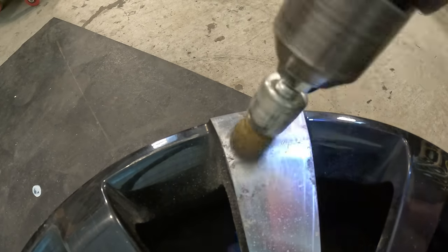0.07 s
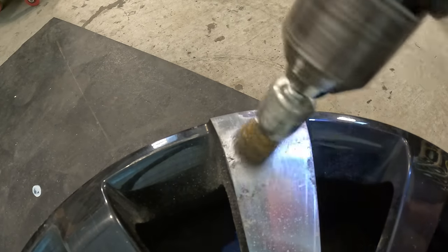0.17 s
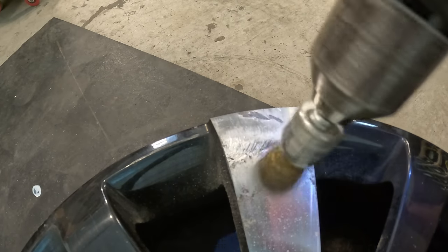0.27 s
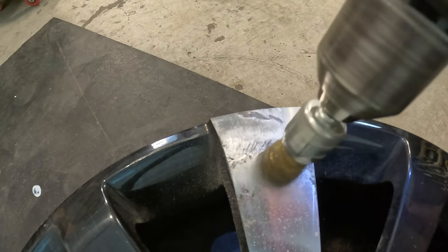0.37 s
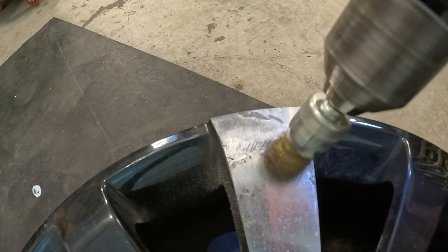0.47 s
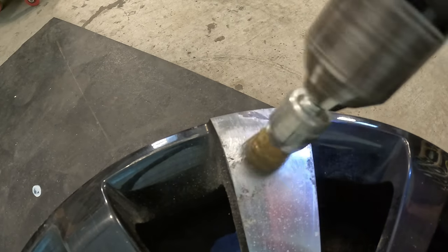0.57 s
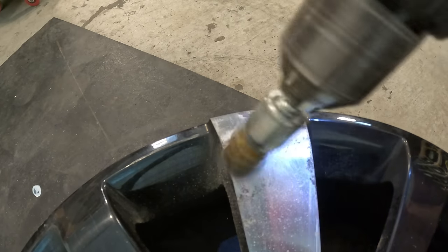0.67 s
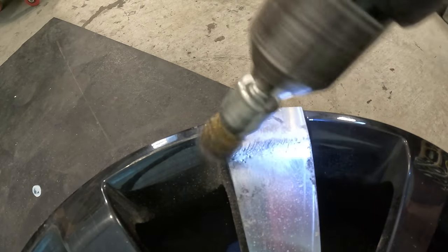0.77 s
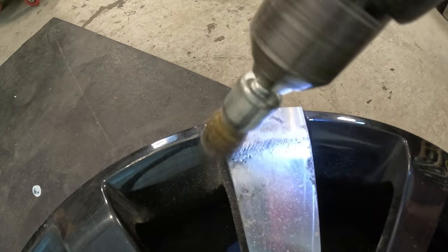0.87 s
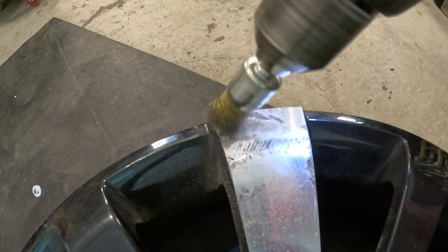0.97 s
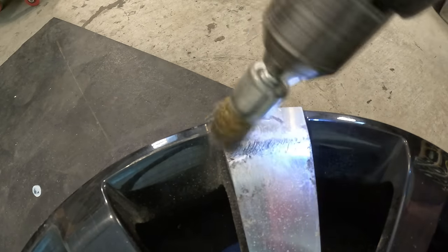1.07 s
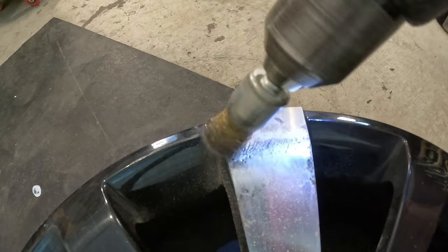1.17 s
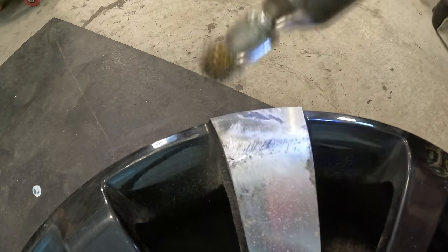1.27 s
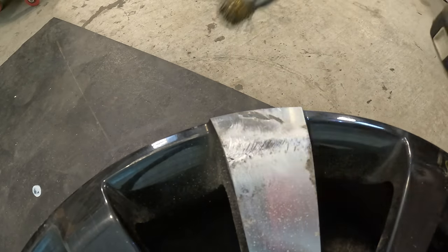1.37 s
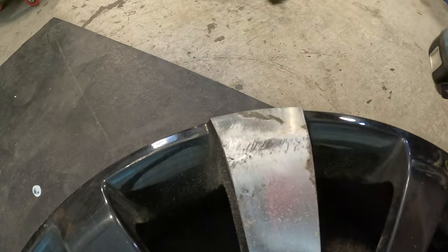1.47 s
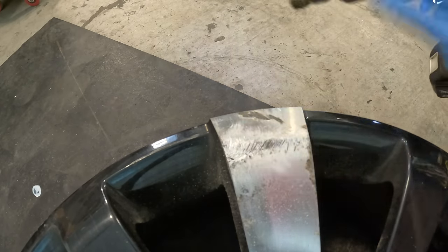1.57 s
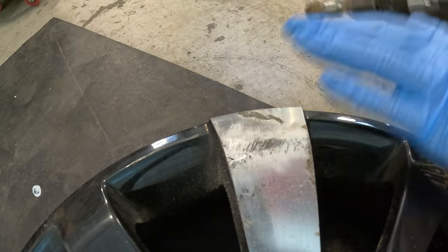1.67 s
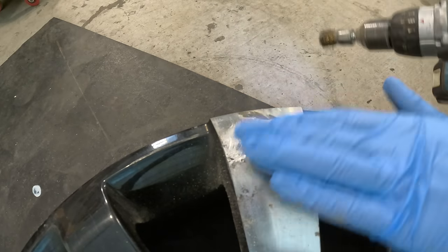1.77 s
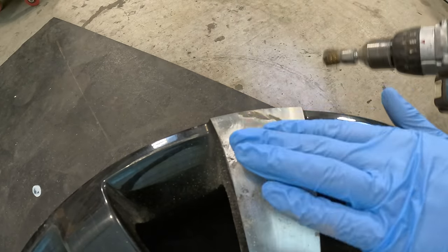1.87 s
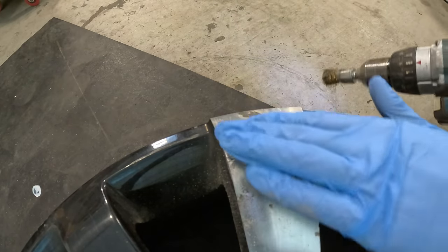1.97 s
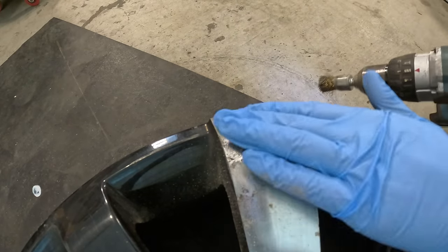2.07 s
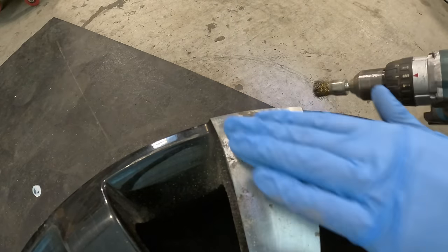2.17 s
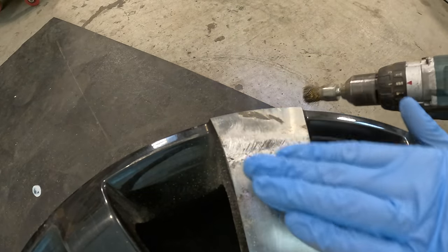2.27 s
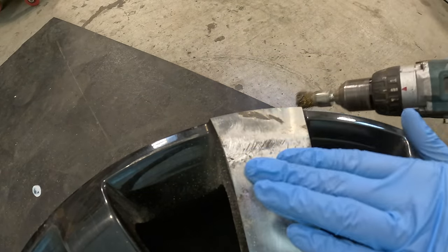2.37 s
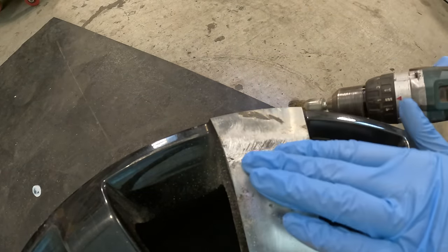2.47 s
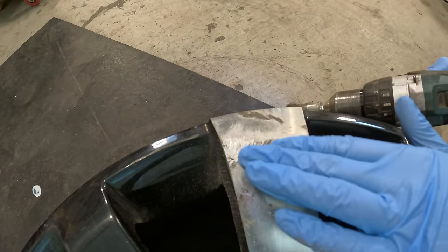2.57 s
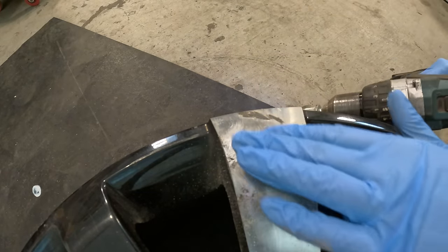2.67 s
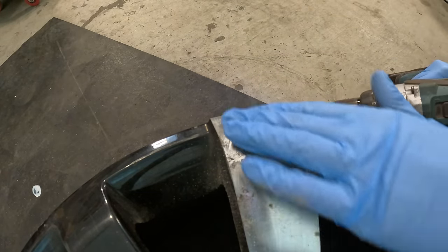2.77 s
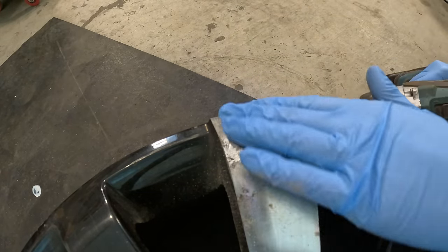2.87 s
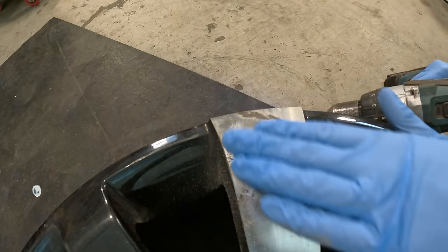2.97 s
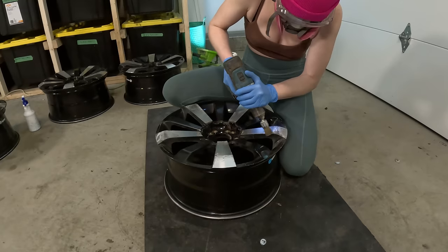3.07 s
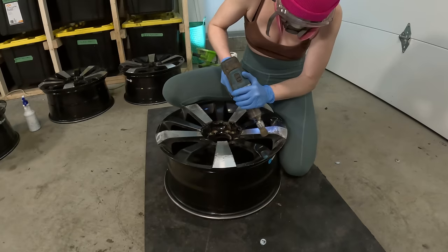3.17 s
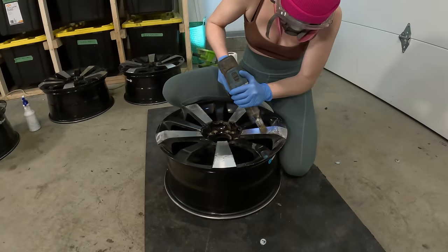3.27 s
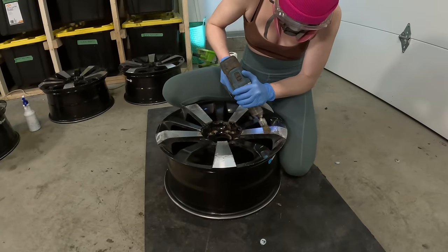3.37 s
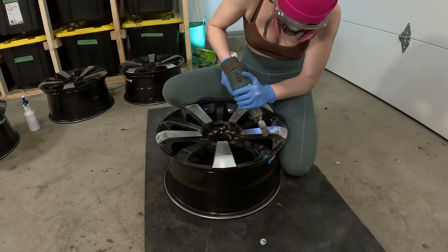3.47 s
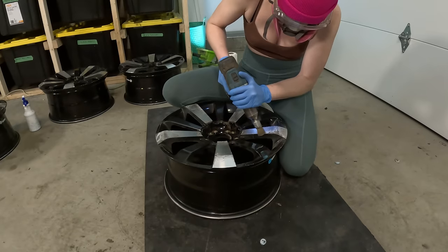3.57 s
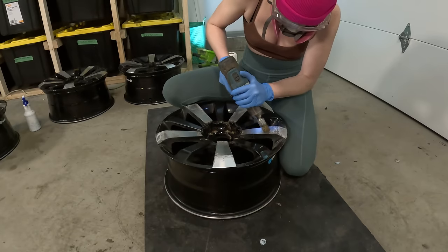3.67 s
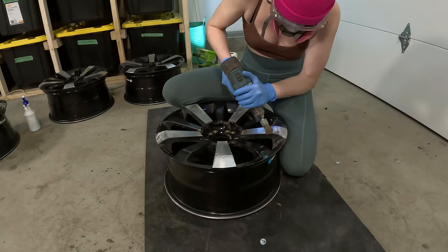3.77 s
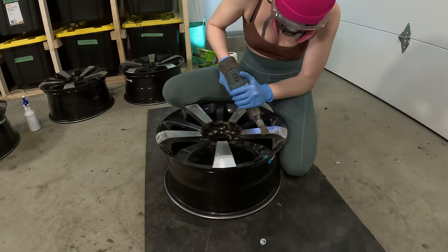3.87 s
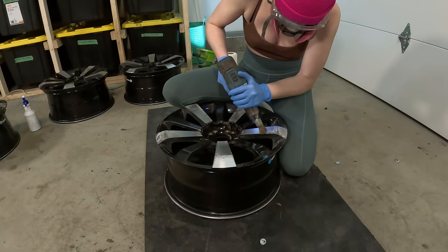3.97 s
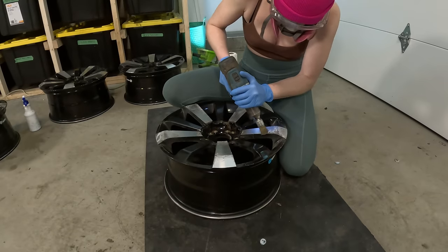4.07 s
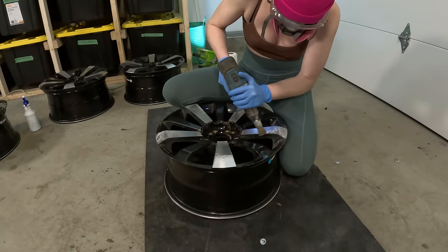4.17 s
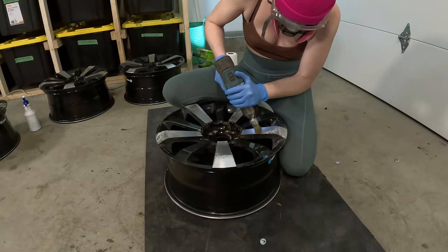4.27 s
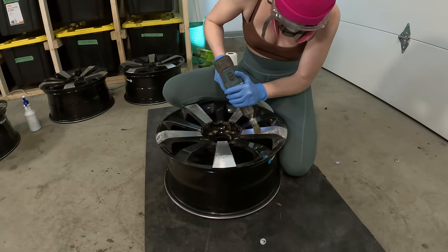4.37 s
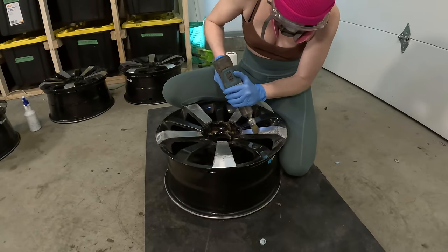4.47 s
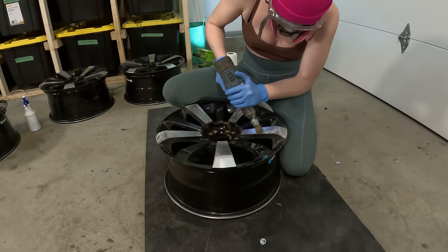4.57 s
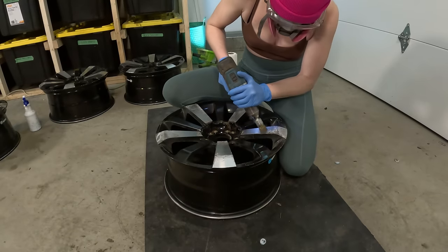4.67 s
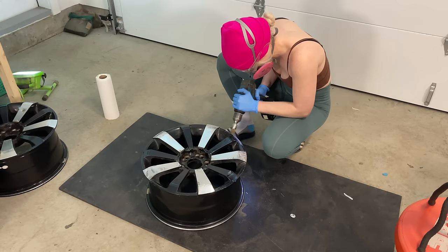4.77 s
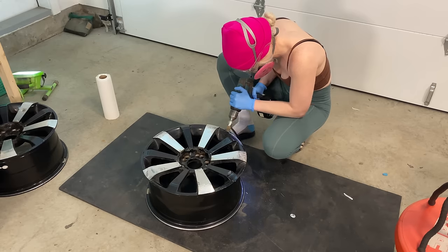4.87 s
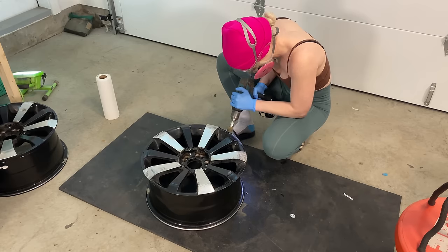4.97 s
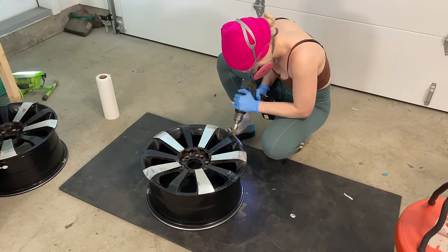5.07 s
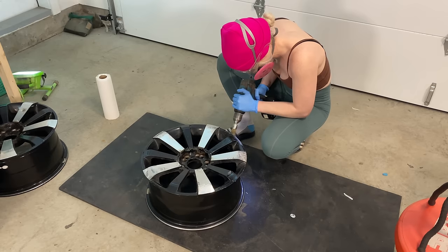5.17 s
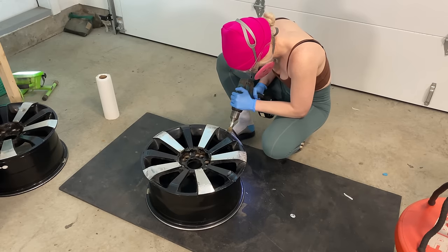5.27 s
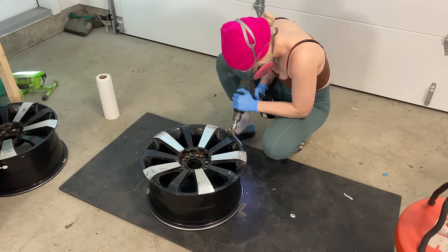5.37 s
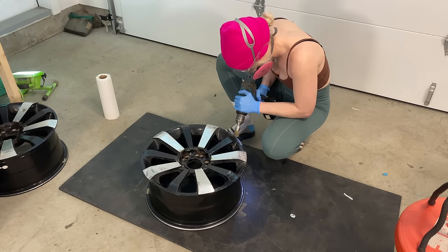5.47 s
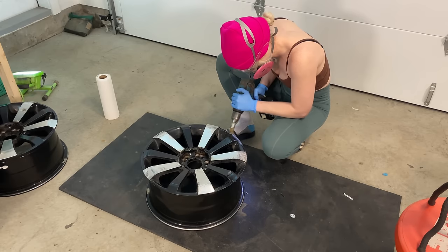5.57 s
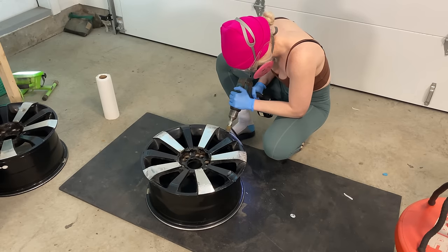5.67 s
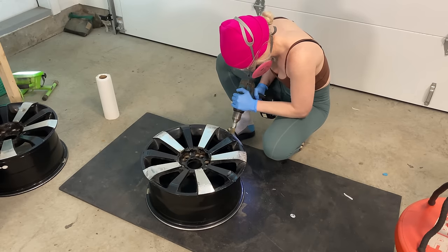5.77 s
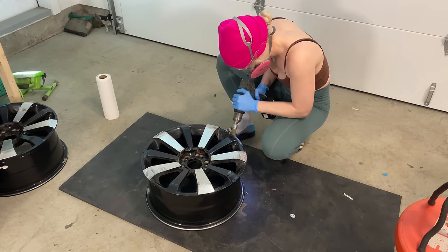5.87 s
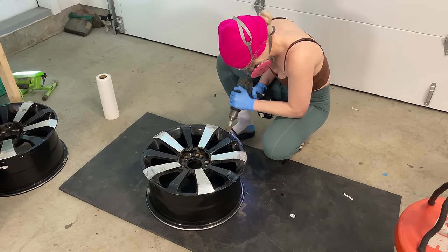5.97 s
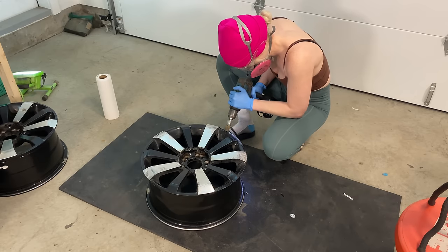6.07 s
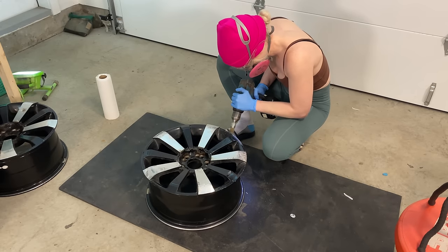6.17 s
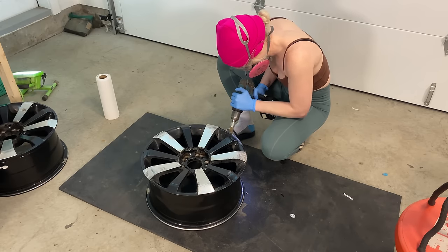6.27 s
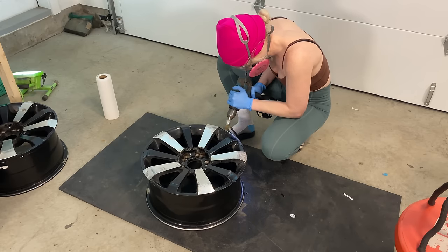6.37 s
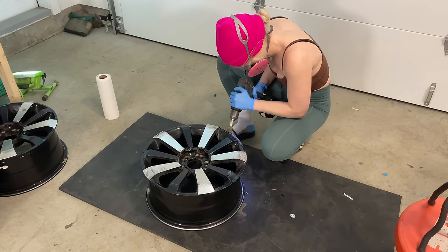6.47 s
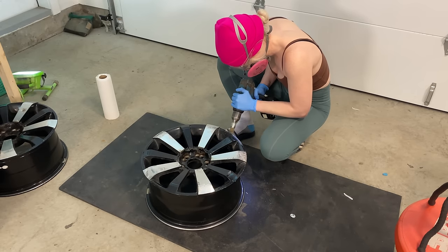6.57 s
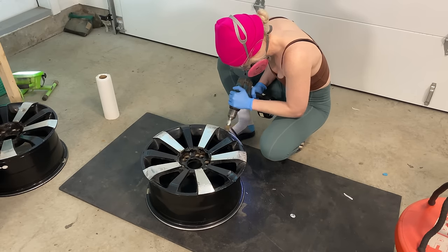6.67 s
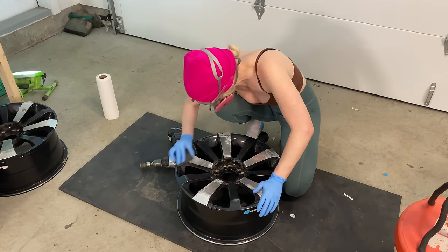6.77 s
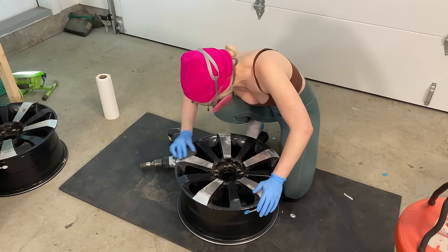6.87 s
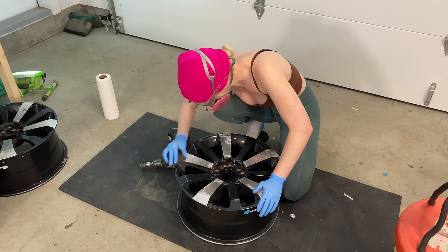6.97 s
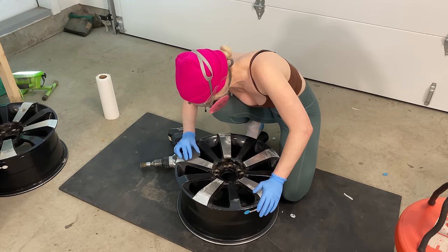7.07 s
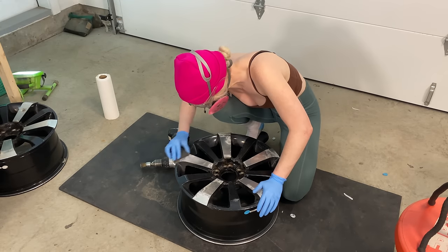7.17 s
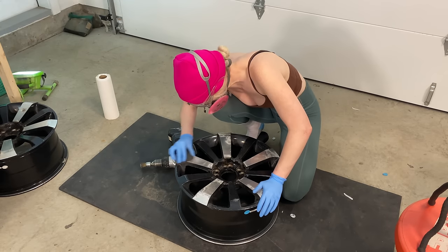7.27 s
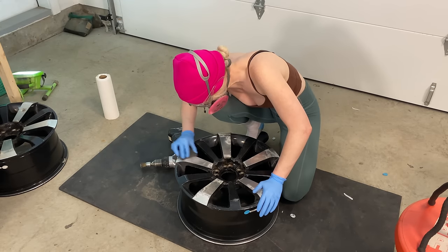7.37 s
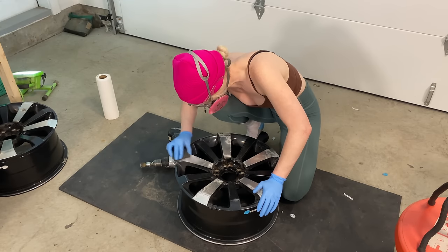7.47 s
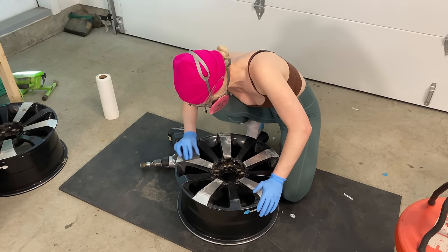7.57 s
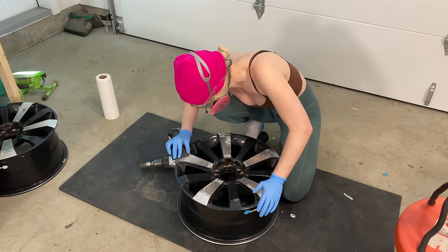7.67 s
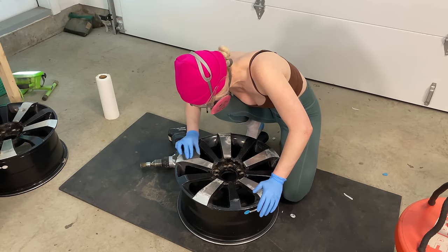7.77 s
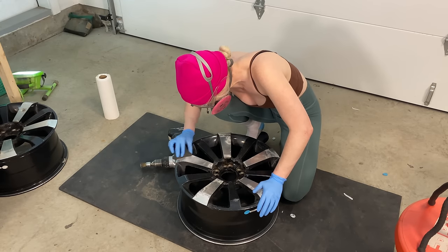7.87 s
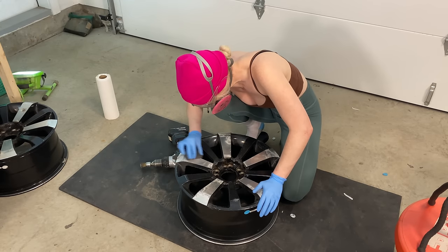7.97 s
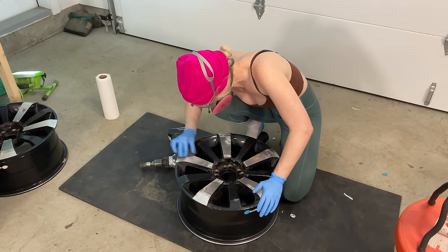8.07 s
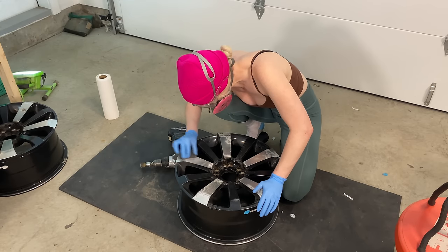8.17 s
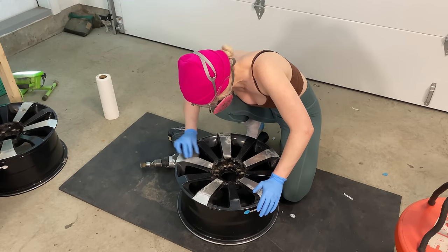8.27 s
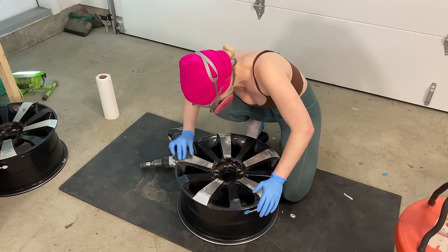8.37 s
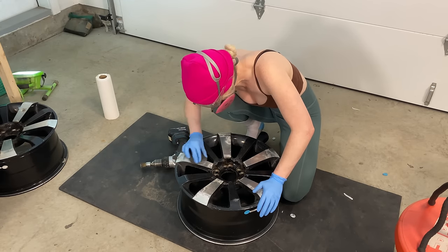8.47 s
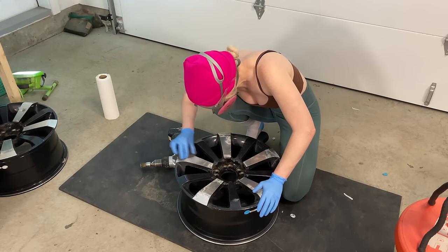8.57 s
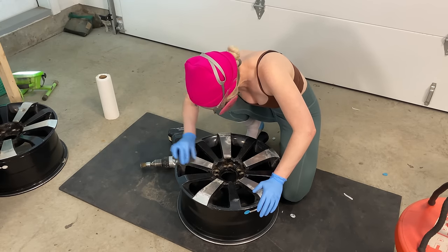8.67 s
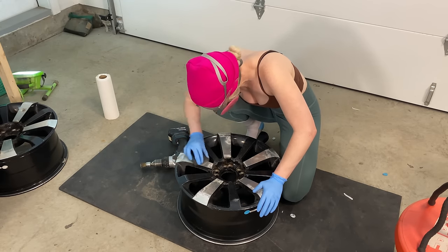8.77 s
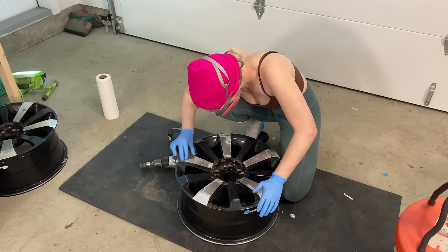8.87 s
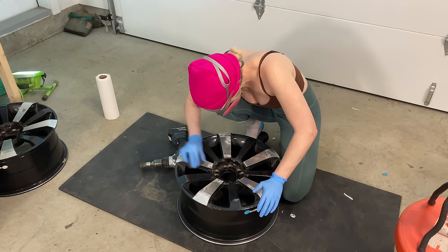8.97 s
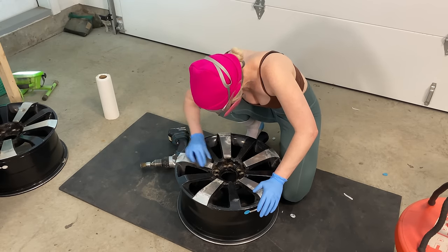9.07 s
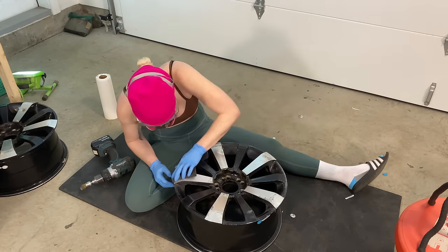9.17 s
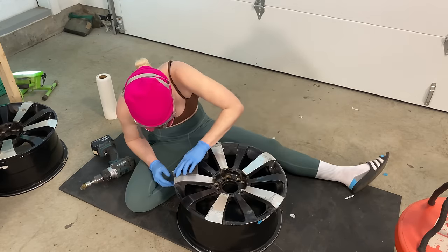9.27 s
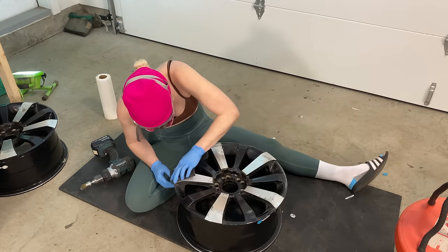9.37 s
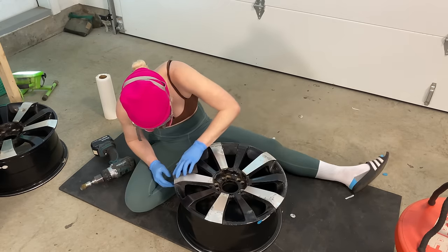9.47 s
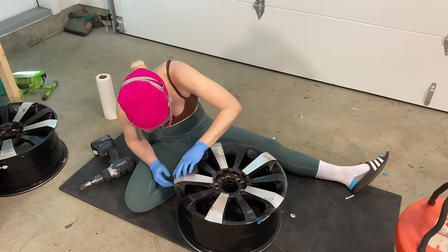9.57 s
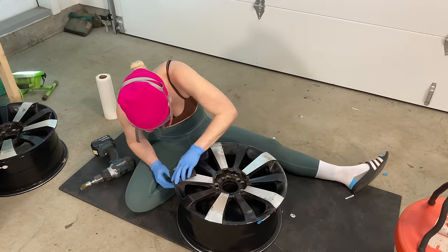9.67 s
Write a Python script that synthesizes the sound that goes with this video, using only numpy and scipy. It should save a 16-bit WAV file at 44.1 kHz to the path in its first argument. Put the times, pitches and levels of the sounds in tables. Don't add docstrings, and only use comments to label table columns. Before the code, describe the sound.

A cordless drill whirs a wire brush harshly on a metal wheel, clacks to a stop, then more brushing gives way to quick hand sanding.

```python
import sys
import numpy as np
from scipy import signal
from scipy.io import wavfile

SR = 44100
rng = np.random.default_rng(int(sys.argv[2]) if len(sys.argv) > 2 else 0)


def attenuation_scalar(level_db):
    decades = np.asarray(level_db, float) / 20
    return 10 ** decades


def wav_out(sig):
    wavfile.write(sys.argv[1], SR, np.round(np.clip(np.atleast_2d(sig).T, -1, 1) * 32767).astype(np.int16))


N = 427769
SWAP_S = 4.806

# f/Hz, then level under the scrape/dB brushed near, wiped, brushed at middle and far range, sanded
WHEEL_MODES = [(1077, -23, -16.5, -33, -26, -23), (1146, -22, -16, -24.5, -24, -24),
               (1858, -24, -48, -52, -23, -48), (2135, -32, -25, -32, -22, -28),
               (2345, -24, -30, -33, -41, -34), (2530, -46, -27, -30, -44, -52),
               (2815, -47, -21, -29, -52, -29), (3100, -31, -18, -29, -26, -26),
               (3370, -21, -18, -19, -34, -26), (3943, -20, -18, -28, -44, -64),
               (4100, -32, -20, -22, -30, -22), (5000, -20, -29, -25, -44, -41),
               (5460, -22, -45, -26, -23, -35), (7272, -34, -18, -45, -42.5, -42)]
# f/Hz, side under mid/dB
SIDE_UNDER_MID = [(60, -8), (200, -9.5), (700, -10.5), (1300, -12.5), (2400, -6), (4400, -11.5),
                  (8000, -13.5), (14000, -1)]
# start t/s, end t/s, scrape level/dB, brightness/dB, body at the start/dB
BRUSH_BOUTS = [
    (0.0, 1.27, -34, 3.5, 4.5),
    (3.038, 4.806, -38, 3.5, 1.5),
    (4.8, 6.74, -41, -3, 1.5),
]
# t/s, f/Hz, level/dB
FAR_SWEEP = [(4.8, 1180, -52), (4.93, 1187, -52), (5.03, 1198, -46), (5.15, 1191, -50), (5.35, 1193, -48),
             (5.59, 1181, -52), (5.7, 1192, -48), (5.82, 1206, -47), (5.93, 1197, -48), (6.02, 1174, -51),
             (6.18, 1204, -46.5), (6.29, 1203, -48), (6.39, 1176, -50), (6.46, 1190, -49),
             (6.57, 1202, -47), (6.74, 1190, -50)]
# multiple of the mesh, level/dB near, middle pressed, middle eased, far pressed, far eased
GEAR_LINES = [(1.0, 0, 0, 0, 0, 0), (1.2, -70, -58, -63, -67, -68), (1.5, -70, -70, -70, -68, -62),
              (1.6, -50, -64, -61, -60, -65), (1.8, -60, -58, -58, -68, -72),
              (1.9, -64, -60, -68, -68, -68), (2.0, -55, -56, -55, -61, -56),
              (2.1, -58, -53, -54, -55, -57), (2.2, -53, -58, -47, -57, -58),
              (2.3, -64, -68, -61, -65, -64), (2.4, -53, -66, -59, -62, -66),
              (2.5, -57, -68, -68, -66, -57), (2.6, -56, -59, -66, -62, -64),
              (2.7, -62, -57, -52, -68, -65), (2.8, -62, -66, -66, -62, -70),
              (2.9, -62, -57, -59, -70, -63), (2.997, -58, -47, -45.5, -58, -56),
              (3.2, -58, -57, -64, -63, -61), (3.4, -53, -62, -62, -66, -66),
              (3.3, -58, -60, -64, -63, -60), (3.5, -58, -64, -66, -63, -60),
              (4.0, -61, -65, -61, -68, -70), (4.2, -57, -57, -59, -58, -54),
              (4.4, -62, -61, -60, -65, -66), (4.6, -64, -62, -58, -67, -62),
              (4.7, -64, -62, -63, -69, -70), (4.8, -64, -60, -60, -69, -70),
              (4.9, -64, -63, -62, -65, -62), (5.3, -62, -63, -63, -70, -65),
              (5.8, -62, -68, -67, -71, -72), (5.9, -62, -63, -68, -72, -66),
              (6.6, -65, -69, -69, -70, -72)]
# stroke middle t/s, length/s, level/dB
BARREL_STROKES = [
    (9.362, 0.082, -45),
    (9.49, 0.091, -49),
    (9.644, 0.079, -43.5),
]


def rms_one(x):
    return x / np.sqrt(np.mean(x ** 2) + 1e-20)


def span_of(rows):
    s, *columns = np.transpose(rows)
    start = max(round(s[0] * SR), 0)
    t = np.arange(start, min(round(s[-1] * SR), N)) / SR
    return start, [np.interp(t, s, column) for column in columns]


def add(out, start, x, fade_s=0.0051):
    size = x.shape[-1]
    n = np.arange(size)
    since_start = n + 1 + (start == 0) * SR
    until_end = size - n + (start + size >= N - 99) * SR
    out[:, start:start + size] += x * np.clip(np.minimum(since_start, until_end) / (fade_s * SR), 0, 1)


def at_hz(points, hz):
    points = np.array(points)
    return np.interp(np.log(hz), np.log(points[:, 0]), points[:, 1])


def drift(rate, size):
    r = np.exp(-80 * np.pi * rate / SR)
    noise = rng.standard_normal(size // 40 + 2002)
    slow = signal.lfilter([1], [1, -2 * r, r * r], noise)[2000:]
    return np.interp(np.arange(size) / 40, np.arange(len(slow)), rms_one(slow))


def resonance(x, hz, width_hz):
    r = np.exp(-np.pi * width_hz / SR)
    return signal.lfilter([1, 0, -1], [1, -2 * r * np.cos(2 * np.pi * hz / SR), r * r], x)


def width_of(hz):
    return 0.0028 * hz * (hz / 1000) ** .8


def sides(mid, side):
    return np.array([mid + side, mid - side])


def millisecond_times(start, end):
    return np.arange(start, end + .001, .001)[:, None]


def energy_sum_db(each_db, rest_db):
    return 10 * np.log10(attenuation_scalar(2 * each_db).sum(axis=1) + attenuation_scalar(2 * rest_db))


def pressed(start, end, s, rise_s, hold_s, db, t60, rest_db):
    t = millisecond_times(start, end)
    rise_db = 20 * np.maximum(s - t, 0) / rise_s
    decay_db = 60 * np.maximum(t - s - hold_s, 0) / t60
    return np.column_stack([t, energy_sum_db(db - rise_db - decay_db, rest_db)])


def hand_strokes(start, end, rows):
    t, (middle, length, db) = millisecond_times(start, end), np.transpose(rows)
    each_db = db - 6 * (2 * (t - middle) / length) ** 2
    return np.column_stack([t, energy_sum_db(each_db, -56.5)])


def grains(size, per_s, spread_db):
    spread = attenuation_scalar(spread_db * np.minimum(rng.exponential(1, (4, size)), 5))
    sizes = spread * rng.standard_normal((4, size))
    return rms_one(sizes * (rng.random((4, size)) < per_s / SR) + 1e-9)


def coloured(stream, tone, patchy_db, top_db=0., bottom_db=0.):
    mid, side, power = 0, 0, 0
    edges = 42 * 2 ** np.arange(0, 8.7, 1 / 3)
    for k, (low, high) in enumerate(zip(edges, edges[1:])):
        hz = np.sqrt(low * high)
        band = signal.butter(2, [low, high], "band", fs=SR, output="sos")
        pair = signal.sosfilt(band, stream[k % 2::2])
        tilt_db = top_db * np.clip(np.log2(hz / 4500), 0, 1)
        tilt_db = tilt_db + bottom_db * np.clip(np.log2(1600 / hz), 0, 1)
        gain = attenuation_scalar(at_hz(tone, hz) + tilt_db + patchy_db * drift(5.0, stream.shape[1]))
        power += attenuation_scalar(2 * at_hz(tone, hz)) * np.mean(pair[0] ** 2)
        mid = mid + gain * pair[0]
        side = side + gain * attenuation_scalar(at_hz(SIDE_UNDER_MID, hz)) * pair[1]
    return sides(mid, side) / np.sqrt(power)


def scrape(out, rows, tone, axis, per_s, spread_db, patchy_db, flutter_db, ring_db, bite=0., fade_s=0.002):
    start, (level_db, *tilts_db) = span_of(rows)
    size = len(level_db)
    swing_db = bite * (level_db - level_db.mean())
    stream = grains(size, per_s, spread_db) * attenuation_scalar(flutter_db * drift(12.0, size))
    sound = coloured(stream, tone, patchy_db, *(tilts_db or [swing_db, -1.5 * swing_db]))
    pressure = attenuation_scalar(level_db)
    rung = 0
    for k, mode in enumerate(WHEEL_MODES):
        hz = mode[0]
        place = attenuation_scalar(2.0 * drift(3.4, size))
        mid, side = resonance(stream[k % 2::2] * pressure * place, hz, width_of(hz))
        unit = np.sqrt(np.mean(pressure ** 2) / np.mean(mid ** 2))
        rung = rung + attenuation_scalar(mode[axis] + ring_db) * unit * sides(mid, attenuation_scalar(at_hz(SIDE_UNDER_MID, hz)) * side)
    add(out, start, pressure * sound + rung, fade_s)


def garage(out):
    # f/Hz, density level/dB per Hz
    stereo_floor = [(24, -28), (40, 7), (109, -14), (180, -2), (270, -13.5), (343, -15.5), (849, -23),
                    (1100, -21), (1820, -35), (6150, -41), (12000, -39), (15600, -72), (22000, -120)]
    mono_floor = [(24, -27), (40, -18), (129, -16.5), (401, -13.5), (551, -15), (713, -20), (1070, -16),
                  (1500, -7.5), (1950, -41), (3300, -120)]
    swap = round(SWAP_S * SR)
    add(out, 0, attenuation_scalar(-69.5) * coloured(rng.standard_normal((4, swap)), stereo_floor, patchy_db=3.0))
    room = attenuation_scalar(-69) * coloured(rng.standard_normal((4, N - swap)), mono_floor, patchy_db=5.5)
    hum = attenuation_scalar(-77 + 6.0) * np.sin(2 * np.pi * 60 * np.arange(N - swap) / SR)
    add(out, swap, room + hum)


def stand_sway(out):
    # t/s, rise/s, hold/s, level/dB, decay T60/s
    stand_jolts = [(0.0, .1, 1.2, -64, 1.3), (1.338, 0.086, 0.039, -34.5, 0.96),
                   (1.666, 0.12, 0.053, -42, 0.21), (1.887, 0.11, 0.017, -56, 0.3),
                   (2.3, 0.093, 0.48, -71, 1.1), (3.053, .06, 1.1, -57, 3.3),
                   (7.726, 0.034, 0.081, -46.5, 0.11), (7.874, 0.044, .03, -56, .3),
                   (7.953, 0.054, 0.047, -56, .15), (8.09, .05, 0.12, -60, .3),
                   (9.24, .06, .46, -67.5, 1.1)]
    t = np.arange(N) / SR
    s, *shape = np.transpose(stand_jolts)
    level_db = np.interp(t, *pressed(0, N / SR, s, *shape, rest_db=-77.5).T)
    late, after = s > SWAP_S, t > SWAP_S
    late_rows = pressed(0, N / SR, s[late], *np.array(shape)[:, late], rest_db=-77.5)
    level_db[after] = np.interp(t[after], *late_rows.T)
    shaken = (t > BRUSH_BOUTS[1][0]) & (t < SWAP_S)
    hz = np.where(shaken, 31.5, 27.4)
    hz[after & (t < BARREL_STROKES[0][0] - .15)] = 19
    sway = np.sin(2 * np.pi * np.cumsum(hz * (1 + 0.019 * drift(2.3, N))) / SR)
    add(out, 0, attenuation_scalar(level_db + 4.5 + 1.6 * drift(7.7, N)) * sway * np.ones((2, 1)))


def mat_thuds(out):
    # t/s, hold/s, level/dB, decay T60/s
    mat_bumps = [
        (1.3, 0.055, -44, 0.83),
        (3.09, 0.71, -67, 1.8),
        (7.503, 0.16, -73, 0.45),
        (7.67, .04, -75, .2),
        (9.27, .4, -74, 1.0),
    ]
    s, *shape = np.transpose(mat_bumps)
    rows = pressed(0, N / SR, s, 0.06, *shape, rest_db=-100)
    thud_db = np.interp(np.arange(N) / SR, *rows.T)
    thud = resonance(resonance(rng.standard_normal((2, N)), 81, 28), 72, 45)
    add(out, 0, attenuation_scalar(thud_db) * rms_one(sides(thud[0], 0.046 * thud[1])))


def housing_knock(out):
    t = np.arange(round(.15 * SR)) / SR
    knock = attenuation_scalar(-36 - 60 * t / .12) * np.sin(2 * np.pi * 330 * t)
    add(out, round(1.256 * SR), knock * np.ones((2, 1)), fade_s=0.0062)


def clacks(out):
    # t/s, peak level/dB, low f/Hz, high f/Hz, decay T60/s
    impacts = [(1.2517, -23.5, 690, 1610, 0.017), (1.254, -21, 300, 6500, 0.041),
               (1.2623, -19.5, 300, 9000, 0.017), (1.2648, -16, 2500, 5000, .035),
               (1.2655, -23, 250, 1500, 0.024), (1.2688, -16.5, 300, 5500, 0.01),
               (1.272, -26, 300, 8000, 0.029), (1.276, -28, 300, 7000, 0.023), (1.288, -33, 600, 5000, .03),
               (1.301, -28.5, 250, 7000, 0.042), (1.321, -30.5, 1000, 7400, 0.095),
               (1.752, -48, 250, 4500, .062), (1.2625, -21, 6500, 8350, .02), (1.324, -39, 6800, 8450, .02),
               (2.203, -44, 2500, 11000, 0.02), (2.242, -38, 2500, 9000, 0.024),
               (7.886, -57, 1000, 9000, .01)]
    t = np.arange(round(.3 * SR)) / SR
    for s, peak_db, low_hz, high_hz, t60 in impacts:
        burst = rng.standard_normal((2, len(t))) * attenuation_scalar(-60 * t / max(t60, .005))
        band = signal.butter(2, [low_hz, np.clip(high_hz, 500, 15000)], "band", fs=SR, output="sos")
        burst = signal.sosfilt(band, burst)
        body = 0
        for mode in WHEEL_MODES:
            body = body + resonance(burst[0], mode[0], 2.5 * width_of(mode[0])) * attenuation_scalar(mode[1] + 20)
        mid = burst[0] / np.abs(burst[0]).max() + attenuation_scalar(-27.0) * body / np.abs(body).max()
        side = 0.3 * burst[1] / np.abs(burst[1]).max()
        add(out, round(s * SR), attenuation_scalar(peak_db) * sides(mid, side), fade_s=0.00036)


def singing(out):
    # t/s, f/Hz, level/dB, rise/s, decay T60/s
    catches = [(0.01, 1153, -32.5, .025, .25), (.2, 1090, -37, 0.027, .3), (0.701, 1079, -36.5, 0.026, .3),
               (.72, 1184, -38, 0.018, .2), (0.941, 1160, -37.5, .04, .3), (1.049, 1170, -36, 0.026, .4),
               (.46, 3930, -38, .04, .5), (5.501, 1075, -53, .04, .4), (7.42, 1148, -59, 0.037, .8),
               (7.97, 1150, -60, 0.056, 1.0), (1.228, 1108, -40, 0.025, .04), (2.31, 2830, -61.5, .05, .3),
               (1.71, 2130, -68, 0.06, 0.28), (1.753, 1170, -73, 0.017, 0.3),
               (1.999, 1077, -61, 0.019, 0.63), (2.23, 1136, -64, 0.046, 0.45),
               (2.25, 2135, -60.5, 0.14, 0.2), (2.31, 7272, -60, .05, 0.46),
               (2.619, 1086, -64, 0.057, 0.69), (2.629, 1145, -66, 0.13, 0.46),
               (2.751, 7200, -65, 0.048, 0.82), (2.87, 2820, -58, 0.023, 0.19),
               (1.86, 662, -77, 0.037, 1.5)]
    t = np.arange(round(.5 * SR)) / SR
    for s, hz, level_db, rise_s, t60 in catches:
        decay_db = 60 * np.maximum(t - rise_s, 0) / t60
        swell = np.clip(t / max(rise_s, .002), 0, 1)
        swell = swell * attenuation_scalar(level_db - decay_db + 3.1 * drift(22, len(t)))
        tone = np.sin(2 * np.pi * hz * t + np.array([[-.3], [.3]]))
        add(out, round(s * SR), swell * tone, fade_s=.003)


def wiping(out):
    # t/s at full pressure, rise/s, hold/s, level/dB, decay T60/s
    glove_strokes = [
        (1.685, 0.086, 0.056, -60, 0.35),
        (1.881, 0.011, 0.0039, -61, 0.12),
        (2.025, 0.088, 0.12, -61.5, 0.24),
        (2.225, 0.061, 0.15, -56.5, 0.36),
        (2.755, 0.19, 0.15, -59.5, 0.22),
        (2.993, 0.027, 0.082, -56.5, .05),
    ]
    # f/Hz, density level/dB per Hz
    glove_tone = [(180, -68), (300, -33), (1010, -38), (1110, -14.5), (1430, -12.5), (2090, -20),
                  (2370, -17.5), (3250, -10), (7370, -10.5), (13000, -26)]
    rows = pressed(1.58, BRUSH_BOUTS[1][0], *np.transpose(glove_strokes), rest_db=-80)
    scrape(out, rows, glove_tone, axis=2, per_s=18000, spread_db=2.0, patchy_db=2.0, flutter_db=1.5,
           ring_db=2.5, bite=0.095, fade_s=0.0013)


def sanding(out):
    # middle t/s, length/s, level/dB
    spoke_strokes = [(6.816, 0.14, -39.5), (6.935, 0.11, -40.5), (7.067, 0.098, -39.5), (7.186, 0.16, -42),
                     (7.321, 0.086, -39.5), (7.425, 0.12, -42.5), (7.546, 0.079, -41.5), (7.654, 0.1, -43),
                     (7.778, 0.081, -42.5), (7.877, 0.082, -45), (7.989, 0.07, -42.5), (8.095, 0.12, -43.5),
                     (8.22, 0.069, -42.5), (8.324, 0.12, -45.5), (8.461, 0.13, -43.5), (8.59, 0.093, -42),
                     (8.722, 0.16, -42), (8.87, 0.096, -41.5), (8.989, 0.12, -42), (9.165, 0.16, -42)]
    # f/Hz, density level/dB per Hz
    spoke_tone = [(47, -49), (80, -38), (98, -29), (521, -10.5), (905, -11), (1100, -9), (1230, -9.5),
                  (2140, -3), (3880, -2.5), (8770, -0.5), (10500, -10), (13300, -5), (15600, -10)]
    barrel_tone = [(47, -50), (80, -18), (145, -33), (169, -17), (281, -8), (400, -15), (545, -7),
                   (1200, -7), (1650, -3), (2250, 0.5), (3100, -5.5), (5300, -5), (8770, -8.5),
                   (15600, -20.5)]
    scrape(out, hand_strokes(6.73, 9.3, spoke_strokes), spoke_tone, axis=5, per_s=20000, spread_db=0.5,
           patchy_db=1.17, flutter_db=0.22, ring_db=0, bite=0.14)
    scrape(out, hand_strokes(9.25, N / SR, BARREL_STROKES), barrel_tone, axis=5, per_s=36000, spread_db=-2.0,
           patchy_db=-0.4, flutter_db=0.0, ring_db=4.5, bite=0.047, fade_s=0.017)


def rim(out):
    # f/Hz, width/Hz, level/dB
    rim_modes = [(5100, 35, -67), (8360, 60, -64), (8900, 40, -63), (9200, 35, -73), (9550, 28, -57),
                 (9640, 30, -63), (13595, 32, -67)]
    # t/s, rise/s, hold/s, level/dB, decay T60/s
    passes = [
        (4.96, .1, 0.13, 0, .3),
        (5.368, 0.16, 0.053, -3, .4),
        (5.767, .15, 0.058, -3, .4),
        (6.11, 0.13, 0.081, 0, .4),
        (6.42, 0.086, .03, 0, .3),
        (6.537, 0.11, 0.074, -3, .4),
        (6.718, .06, .03, 3, 0.34),
    ]
    rows = pressed(BRUSH_BOUTS[2][0], BRUSH_BOUTS[2][1], *np.transpose(passes), rest_db=-17.0)
    start, (pass_db,) = span_of(rows)
    for hz, width_hz, db in rim_modes:
        ring = rms_one(resonance(rng.standard_normal(len(pass_db)), hz, width_hz))
        add(out, start, attenuation_scalar(db + pass_db + 3.0 * drift(5.0, len(ring))) * ring * np.ones((2, 1)))


def whine(out, start, hz, level_db, lines, eased, jitter, wander_db=0.):
    size = len(hz)
    turns = 2 * np.pi * np.cumsum(hz * (1 + jitter * drift(23.7, size))) / SR
    for order, pressed_db, eased_db in lines:
        phase = rng.uniform(0, 2 * np.pi) + np.array([[-.15], [.15]])
        line = np.sin(order * turns + phase)
        if order == 1:
            flicker_db = wander_db * (0.5 + np.minimum(2 * drift(30, size), 0))
        else:
            flicker_db = 2.2 * drift(9.5, size)
        load_db = level_db * (order == lines[0][0])
        gain = attenuation_scalar(load_db + pressed_db + eased * (eased_db - pressed_db) + 4.0 + flicker_db)
        add(out, start, gain * line * attenuation_scalar(np.array([[-.4], [.4]])), fade_s=0.0032)


def sidebands():
    base_db = (-53, -54, -54, -57.5, -56.5)
    teeth = 10
    strong = [round(line[0] * teeth) for line in GEAR_LINES]
    weak = []
    for k in range(23, 80):
        if k not in strong:
            chance_db = 3 * np.minimum(rng.standard_normal(5), 1)
            weak.append((k / teeth, *(np.array(base_db) - 2.3 * k / teeth + chance_db)))
    return weak


def drill(out):
    # t/s, f/Hz, level over its usual one/dB
    rotor_bouts = [
        [(0, 446.5, 0), (1.25, 446.5, 0)],
        [(3.038, 440.5, -2), (4.39, 441, -2), (4.42, 436.5, 3), (4.806, 436.5, 3)],
        [(4.8, 448, 0), (5.8, 449.5, 0), (6.74, 449.5, 0)],
    ]
    # multiple, level/dB near, middle, far
    rotor_lines = [(3, -66, -67, -63), (4, -63, -71, -67), (5, -63, -69, -65), (6, -57, -61, -67),
                   (7, -54, -64, -66), (8, -54, -63, -60), (9, -53, -62, -62), (10, -57, -64, -68),
                   (11, -60, -62, -68)]
    # t/s, f/Hz, level/dB
    mesh_bouts = [
        [(0, 1153, -52), (.5, 1172, -52), (.76, 1180, -47), (.84, 1162, -47), (1.0, 1156, -48),
         (1.13, 1158, -48), (1.25, 1172, -46)],
        [(3.038, 1350, -50), (3.22, 1332, -48), (3.34, 1330, -48), (3.39, 1344, -50), (3.5, 1341, -49),
         (3.57, 1335, -46), (3.75, 1331, -46), (3.81, 1340, -47), (3.88, 1333, -45.5), (4.06, 1339, -45.5),
         (4.27, 1332, -45), (4.36, 1341, -46), (4.46, 1349, -51), (4.6, 1353, -52), (4.806, 1348, -51)],
    ]
    eased_hz = [
        (2000, 2100),
        (1339, 1349),
        (1190, 1202),
    ]
    far_mesh = [(s, hz, db - 0.5) for s, hz, db in FAR_SWEEP]
    gear_columns = [[0, 1, 1], [0, 2, 3], [0, 4, 5]]
    wanders_db = [2.5, 1.5, 2.0]
    for bout, (rotor, mesh) in enumerate(zip(rotor_bouts, [*mesh_bouts, far_mesh])):
        start, (third_hz, third_db) = span_of(rotor)
        lines = np.array(rotor_lines)[:, [0, bout + 1, bout + 1]]
        whine(out, start, third_hz / 3, third_db, lines, 0, jitter=0.00063)
        start, (mesh_hz, mesh_db) = span_of(mesh)
        eased = np.interp(mesh_hz, eased_hz[bout], [0, 1])
        lines = np.array([*GEAR_LINES, *sidebands()])[:, gear_columns[bout]]
        whine(out, start, mesh_hz, mesh_db, lines, eased, jitter=0.00026, wander_db=wanders_db[bout])


def brush_levels():
    body_sag = (1.1, 2, 1)
    # t/s, level/dB
    lean_rows = [(0.0, -32), (0.008, -32.5), (0.602, -35), (0.902, -32.5), (1.15, -34.5)]
    bouts = []
    for (start, end, db, bright_db, body_db), sag_db in zip(BRUSH_BOUTS, body_sag):
        t = millisecond_times(start, end)
        bouts.append(np.column_stack([t, db + 0 * t, bright_db + 0 * t, body_db - sag_db * (t - start)]))
    near, middle, far = bouts
    lean_db = np.interp(near[:, 0], *np.transpose(lean_rows))
    near[:, 1] += lean_db - lean_db.mean()
    near[:, 1] -= 45 * np.maximum(near[:, 0] - 1.176, 0)
    tail_t60_s = 0.67
    t = millisecond_times(0, tail_t60_s * .6)
    tail = np.column_stack([near[-1, 0] + t, -39.5 - 60 * t / tail_t60_s, near[-1, 2] - 20 * t, 12 + 0 * t])
    speed_hz = np.interp(far[:, 0], *np.transpose(FAR_SWEEP)[:2])
    far[:, 1] += 0.0734 * (speed_hz - speed_hz.mean())
    return near, tail, middle, far


def brushing(out):
    # f/Hz, density level/dB per Hz
    near_tone = [(29, -35.5), (50, -6.5), (221, -13), (286, -27), (448, -17), (808, -12.5), (909, -7),
                 (975, -14), (1150, -2.5), (1260, -3.5), (1360, -1), (2300, -4.5), (4010, 0), (7400, -12.5),
                 (10100, -21), (14000, -38)]
    middle_tone = [(29, -42), (50, -18), (97, -27), (346, -23), (437, -19.5), (975, -11.5), (1120, -7),
                   (1230, -3.5), (1320, 2), (1460, -8), (2280, -9.5), (4110, -1.5), (5300, -9),
                   (7400, -14.5), (9160, -21), (14000, -35)]
    far_tone = [(47, -64), (80, -28.5), (383, -24), (447, -14), (510, -12.5), (742, -14.5), (988, -16.5),
                (1180, -12), (1290, -10), (2440, -10.5), (3710, -4.5), (9160, -12), (10200, -20),
                (15600, -18)]
    near, tail, middle, far = brush_levels()
    scrape(out, tail, near_tone, axis=1, per_s=SR, spread_db=-2.0, patchy_db=2.0, flutter_db=-1.5, ring_db=-10.5)
    scrape(out, near, near_tone, axis=1, per_s=14000, spread_db=2.0, patchy_db=0.0, flutter_db=-1.2, ring_db=6.5)
    scrape(out, middle, middle_tone, axis=3, per_s=16000, spread_db=1.5, patchy_db=0.6, flutter_db=-0.3,
           ring_db=8.5, fade_s=0.0011)
    scrape(out, far, far_tone, axis=4, per_s=16000, spread_db=0.0, patchy_db=1.0, flutter_db=0.5, ring_db=2.0)


def scene():
    out = np.zeros((2, N))
    for source in (garage, stand_sway, mat_thuds, housing_knock, clacks, singing, wiping, sanding, rim,
                   drill, brushing):
        source(out)
    return out


def roll_off(x):
    return signal.sosfilt(signal.butter(12, 15700, fs=SR, output="sos"), x)


def record(dry):
    # f/Hz, width/Hz, level added/dB
    capsule_peaks = [
        (9070, 380, -2),
        (12400, 1600, -8),
    ]
    low = signal.sosfiltfilt(signal.butter(1, 4500, fs=SR, output="sos"), dry[0])
    left = dry[0] + .8 * (np.roll(low, shift=2) - low)
    ports = np.array([left, dry[1]]) * attenuation_scalar(np.array([[.15], [-.15]]))
    under = signal.sosfiltfilt(signal.cheby2(6, 20, 11500, fs=SR, output="sos"), ports)
    ports = under + attenuation_scalar(-7.5) * (ports - under)
    ports = signal.sosfilt(signal.cheby2(8, 30, 15300, fs=SR, output="sos"), ports)
    mono = dry.mean(axis=0)
    mono = mono + sum(attenuation_scalar(db) * np.pi * width / SR * resonance(mono, hz, width)
                      for hz, width, db in capsule_peaks)
    first = np.clip((SWAP_S + 0.0066 - np.arange(N) / SR) / 0.0094, 0, 1)
    top_cut = signal.ellip(10, .3, 60, 15700, fs=SR, output="sos")
    mixed = signal.sosfilt(top_cut, first * ports + (1 - first) * mono)
    return roll_off(mixed)


dry = scene()
out = record(dry)
wav_out(out)
```